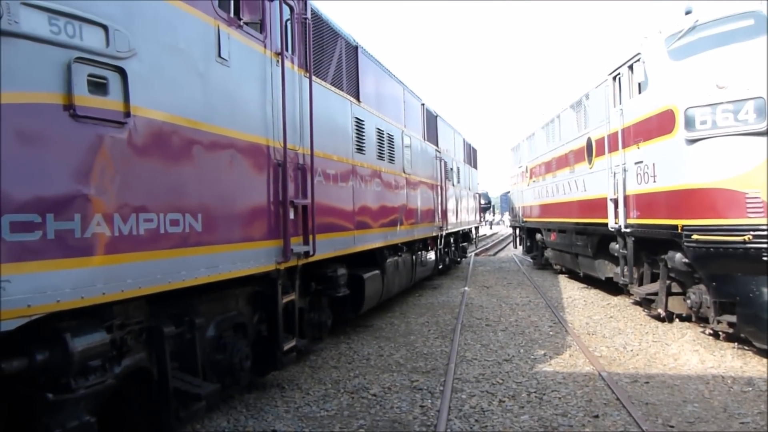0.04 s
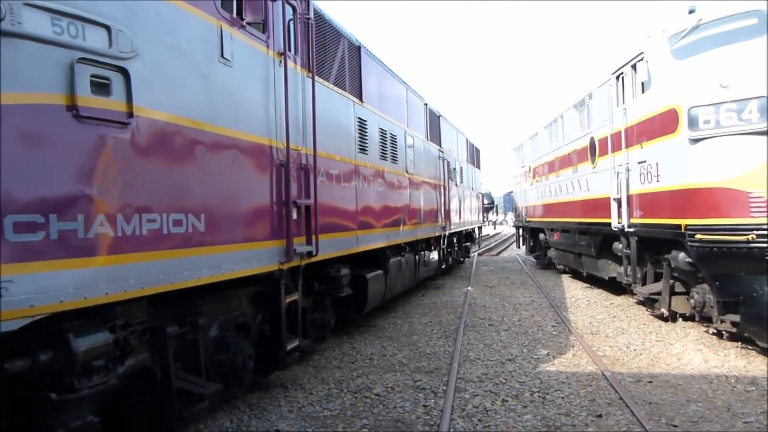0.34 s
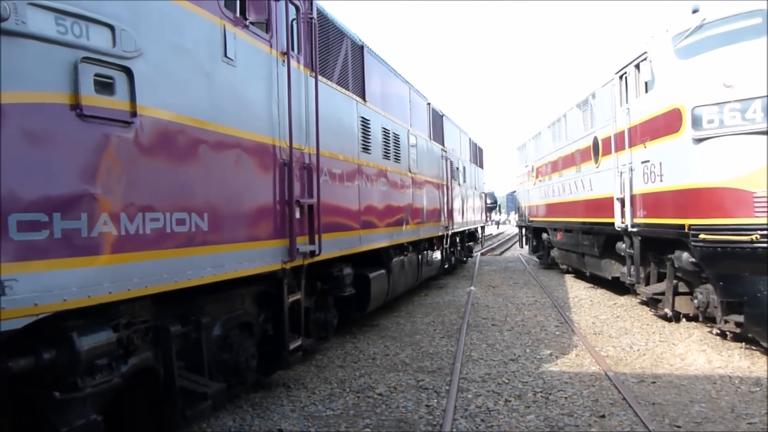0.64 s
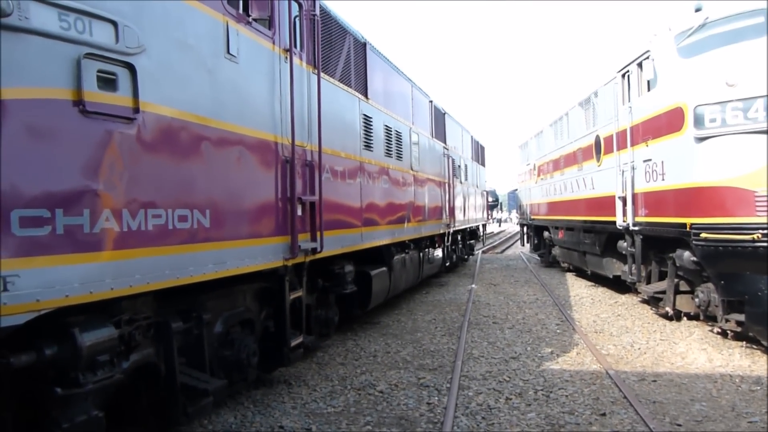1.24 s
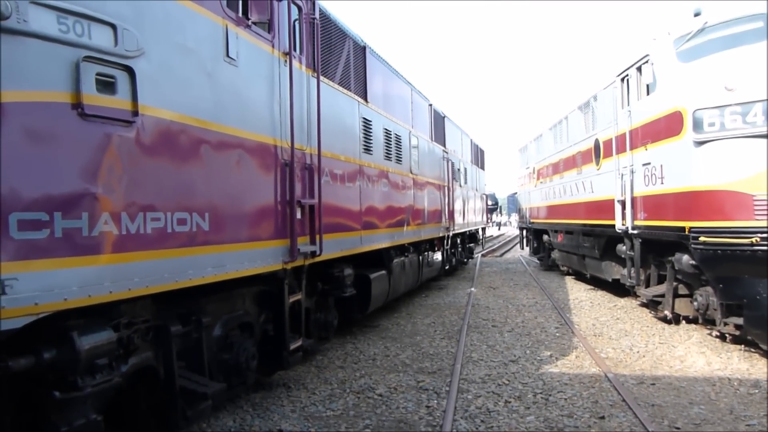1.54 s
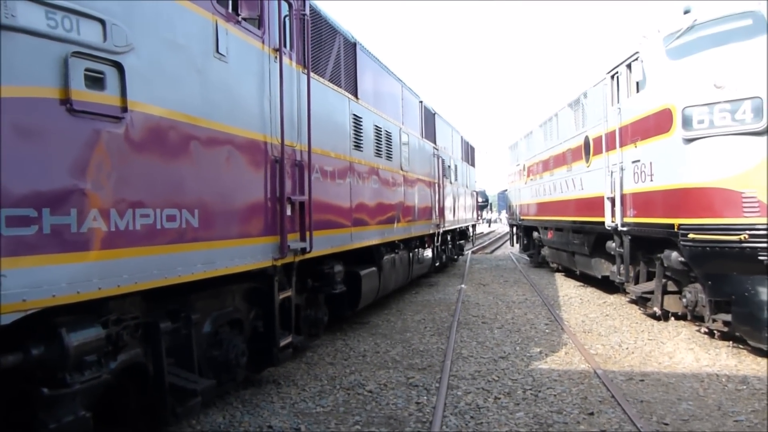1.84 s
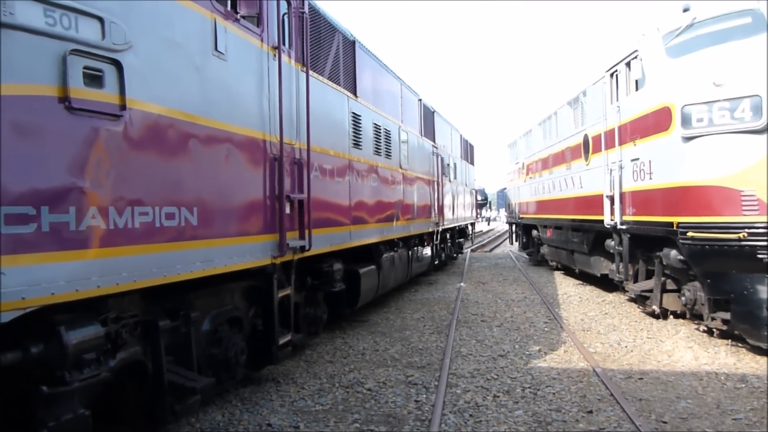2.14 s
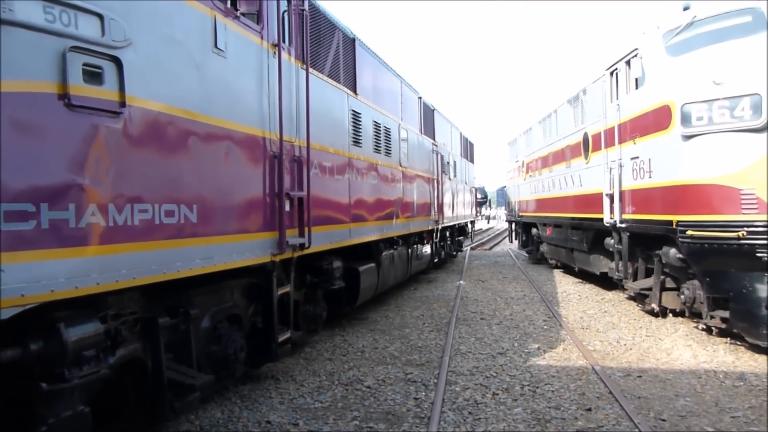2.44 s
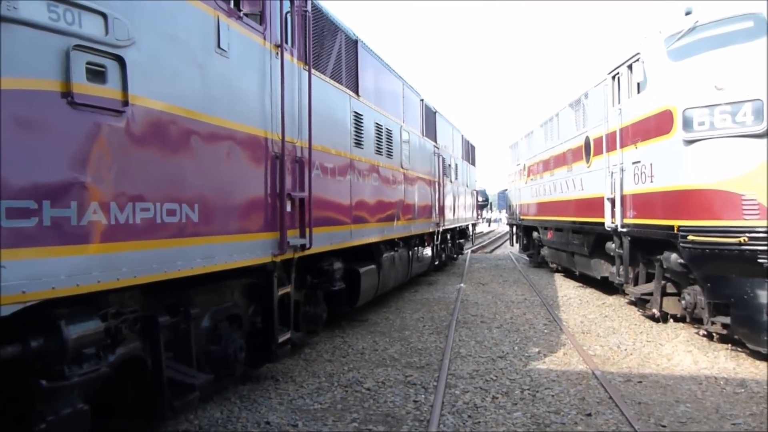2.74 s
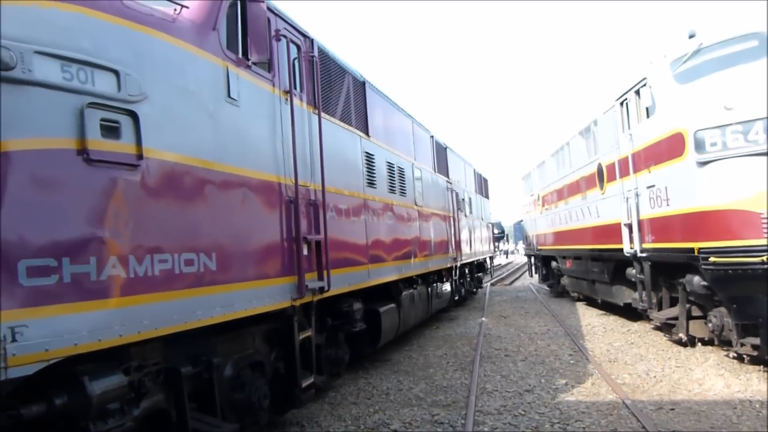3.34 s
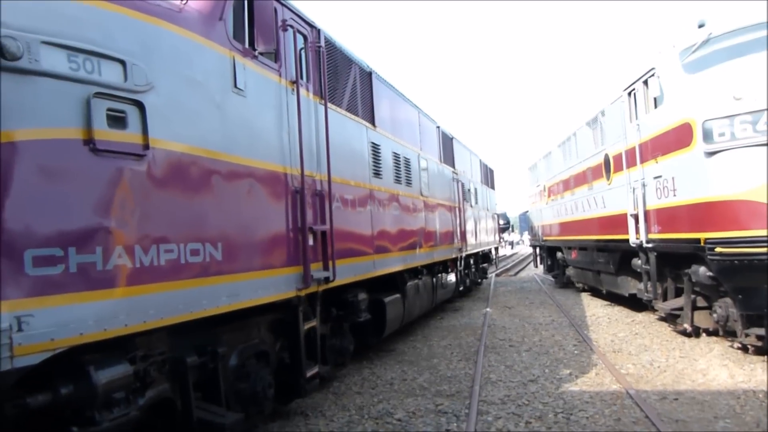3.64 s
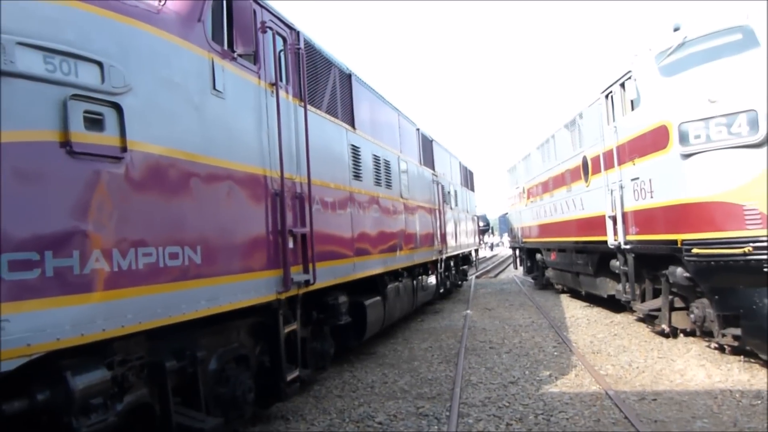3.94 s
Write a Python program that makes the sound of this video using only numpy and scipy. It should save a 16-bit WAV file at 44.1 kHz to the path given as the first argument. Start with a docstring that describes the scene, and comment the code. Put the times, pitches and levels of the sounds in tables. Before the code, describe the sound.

A train bell rings evenly while a diesel idles and compressed air hisses softly.

```python
"""A locomotive bell clangs about every 0.86 s between two parked diesel trains.
Each blow of the clapper flares bright partials that fade between strokes, while three low ones ring on;
the steel car sides scatter the ring into a shimmer. An idling engine rumbles underneath,
compressed air hisses, and an automatic gain control ducks the whole mix at each stroke."""
import sys
import numpy as np
from scipy import signal
from scipy.io import wavfile
from scipy.ndimage import uniform_filter1d

SR = 44100
rng = np.random.default_rng(int(sys.argv[2]) if len(sys.argv) > 2 else 0)


def to_wav(s):
    """Save 16-bit WAV."""
    ch = np.atleast_2d(s).T  # columns
    pcm = np.round(np.clip(ch, -1, 1) * 32767)  # PCM
    wavfile.write(sys.argv[1], SR, pcm.astype(np.int16))


N = 176400
ATTACK_S = 0.011  # onset of the clang and the clank
SCATTER_HZ = 16  # speed of the shimmer from reflections


def bell_bright():
    """Upper partials flare at each blow and die away, beating with twins and rippled by reflections."""
    # Upper bell modes: pitch_hz, level_db, t60_s, rise_s, balance_db, beat_hz, twin_share
    partials = [ (2420.7, -29, 1.6, .012, -2, 5, .05), (2466, -41, 1.3, .005, 0, 5, .2),
                (2636.4, -19.5, .95, .005, 1.5, 4, .05), (3426, -39, .65, .004, 0, 7, .6),
                (3820, -37.5, 1.4, .005, -2, 7, .65), (3923, -27, .55, .025, -2, 3.5, .6),
                (3972, -37, .7, .004, 0, 5, .3), (4087, -39, .9, .004, 0, 6, .3),
                (5056.5, -33, .6, .012, -1, 6.5, .6), (5410, -23, 1.1, .006, -1, 3, .05),
                (6100.5, -34, 1.2, .03, 0, 6, .2), (6370, -35, .65, .004, 0, 6, .3),
                (6820, -30.5, 1.0, .004, 0, 2, .3), (7014.5, -29, .8, .005, 4, 9, .2),
                (7111.5, -27, .9, .015, -3, 4, .2), (7220.5, -29, .75, .004, -3, 3, .2),
                (8635, -40, .6, .003, 0, 8, .3), (8752.5, -32, .75, .004, -2, 8, .3),
                (8935, -37, .75, .004, 0, 5, .3), (10509, -38, .65, .004, 0, 6, .3),
                (10557, -30, .7, .012, 1, 4, .2), (10582, -41, .6, .004, 0, 6, .3),
                (11228, -41, .6, .008, 0, 7, .3), (11272, -45, .6, .004, 0, 5, .3),
                (12202, -45, .55, .008, 0, 6, .3), (12322, -49, .55, .004, 0, 5, .3),
                (12437, -41.5, .55, .008, 0, 7, .3), (14003, -49, .5, .004, 0, 6, .3),
                (14223, -39, .52, .012, -1, 4, .2)]
    age, colour_db, _ = strokes()
    t, out = np.arange(N) / SR, np.zeros((2, N))
    for hz, db, t60, rise_s, balance_db, beat_hz, twin_share in partials:
        envelope = amp(db + stroke_colour(colour_db, hz) - 60 * age / t60) * (1 - np.exp(-age / rise_s))
        pair = np.exp(2j * np.pi * hz * t) * (1 + twin_share * np.exp(2j * np.pi * beat_hz * age))
        spread = stereo_phase(hz) * rng.choice([-1, 1])
        direct = np.exp(1j * (2 * np.pi * rng.random() + spread))
        reflected = .32 * ripple(SCATTER_HZ)
        out += sides(balance_db) * envelope * ((direct + reflected) * pair).real
    return out


def bell_long():
    """Hum, prime and tierce ring from blow to blow, each beating with a weak, steady twin."""
    # The three low bell modes: pitch_hz, t60_s, settle_s, balance_db, twin_offset_hz, twin_db
    partials = [(733.2, 7, .12, 2.5, -2.5, -43), (1356.8, 6, .2, .5, 2.5, -48),
                (1582.2, 8, .008, -4, -15, -33)]
    age, _, long_db = strokes()
    t, out = np.arange(N) / SR, np.zeros((2, N))
    for level_db, (hz, t60, settle_s, balance_db, twin_offset_hz, twin_db) in zip(long_db, partials):
        target = amp(level_db - 60 * age / t60)
        envelope = smooth(target - target[0], settle_s) + target[0]
        direct = sides(balance_db) * np.exp(1j * stereo_phase(hz))
        twin = amp(twin_db) * np.exp(2j * np.pi * (twin_offset_hz * t + rng.random()))
        reflected = .11 * ripple(SCATTER_HZ)
        out += ((envelope * (direct + reflected) + twin) * np.exp(2j * np.pi * hz * t)).real
    return out


def bell_clang(count=90, t60_s=0.9):
    """Many weak, close modes make the first moments of each stroke dense and metallic."""
    # Strength of a clang mode by its pitch: pitch_hz, level_db
    spectrum = [(2400, -29), (2800, -52), (3100, -65), (4000, -69.5), (4600, -104), (5400, -51.5),
                (7000, -62), (7800, -60), (8800, -46), (9700, -60), (11000, -65), (14400, -55)]
    age, colour_db, _ = strokes()
    t, ring = np.arange(SR) / SR, np.zeros((2, SR))
    edges = np.geomspace(spectrum[0][0], spectrum[-1][0], count + 1)
    for low, high, (place, turn, offset) in zip(edges, edges[1:], rng.random((count, 3))):
        hz = low + place * (high - low)
        phase = 2 * np.pi * turn + np.array([[1], [-1]]) * (offset - .5) * 2
        ring += amp(curve_at(spectrum, hz)) * np.sin(2 * np.pi * hz * t + phase)
    ring *= np.minimum(t / ATTACK_S, 1) * amp(-60 * t / t60_s)
    since_blow = np.minimum((age * SR).astype(int), SR - 1)  # each blow restarts the same ring
    return amp(colour_db.mean(axis=0)) * ring[:, since_blow]


def clapper(level_db=-23.5, t60_s=0.082, echo_db=-17, echo_t60_s=0.56):
    """The clapper lands with a short, noisy clank that echoes between the trains."""
    # Spectrum of the impact: frequency_hz, relative_db
    spectrum = [(400, -3), (1500, 0.5), (2650, -12), (3100, -10), (4000, -5), (4600, -10), (6800, -7),
                (8000, -25), (11000, -16), (15000, -33)]
    age, colour_db, _ = strokes()
    attack = np.minimum(age / ATTACK_S, 1)
    fade = amp(-60 * age / t60_s) + amp(echo_db - 60 * age / echo_t60_s)
    return amp(level_db + colour_db.mean(axis=0)) * attack * fade * noise(spectrum)


def strokes():
    """Per sample: seconds since the latest blow, its four colour levels and its three low-mode levels."""
    # Each blow has its own colour and meets the low modes in or out of step, leaving each at a new level.
    # start_s, colour_db in four bands from low to high, hum_db, prime_db, tierce_db
    blows = [(-.26, 8.5, 5, 6.5, -1, -24, -29.5, -17.5), (.603, 1.5, 1, 1.5, -9, -21.5, -25.5, -21),
             (1.46, 4, 5.5, 2.5, -2, -35.5, -27.5, -18), (2.322, 2, 4, 1, 2, -27.5, -33, -18.5),
             (3.192, 5, 3, 4, 7, -28, -26, -23.5)]
    rows, t = np.array(blows), np.arange(N) / SR
    latest = np.maximum(np.searchsorted(rows[:, 0], t, side="right") - 1, 0)
    blow = rows[latest].T
    return np.maximum(t - blow[0], 0), blow[1:5], blow[5:]


def stroke_colour(colour_db, hz):
    """The blow's boost or cut in dB at one pitch, blended between its colour bands."""
    # Centres of the four colour bands: frequency_hz
    bands = [3400, 5400, 7000, 10700]
    return sum(np.interp(hz, bands, share) * db for share, db in zip(np.eye(len(bands)), colour_db))


def engine(waver_depth=0.47, waver_hz=1.06):
    """The idling diesel: a broad roar with wavering tones in it."""
    # Tones of the idle: pitch_hz, level_db
    idle_tones = [(48, -43), (58, -57.5), (86, -41.5), (97.7, -39), (107, -48.5), (134, -50), (181, -40),
                  (295, -46), (411, -39.5), (705.3, -38), (1059, -43.5), (1410, -47), (1481, -52),
                  (1498, -45.5)]
    # Spectrum of the roar: frequency_hz, relative_db
    roar_spectrum = [(15, -33), (27, -11), (42, -5), (68, -3.5), (92, -1), (150, -4), (185, 0.5),
                     (290, 2.5), (460, 2.5), (580, -2.5), (730, -2), (950, -11.5), (1250, -18),
                     (1700, -17.5), (2100, -16.5), (2600, -28), (3100, -31.5), (5000, -34.5), (15000, -63)]
    # Gentle swells of the roar: time_s, level_db
    roar_level = [(0, -25), (.7, -24.5), (1.35, -23.5), (1.6, -27), (2.2, -24), (2.45, -27), (3.1, -24.5),
                  (3.5, -25.5), (4, -24.5)]
    t, tones = np.arange(N) / SR, np.zeros(N)
    for hz, db in idle_tones:
        waver = 1 + waver_depth * ripple(waver_hz, channels=1)[0]
        tones += amp(db) * (waver * np.exp(2j * np.pi * (hz * t + rng.random()))).real
    return tones + fader(roar_level) * noise(roar_spectrum, patch_db=0.8)


def air():
    """Escaping compressed air hisses, swelling and easing."""
    # Spectrum of the hiss: frequency_hz, relative_db
    spectrum = [(1000, -8), (2800, 4), (4500, 2.5), (7500, -0.5), (9800, -4.5), (12500, -5), (14000, -10.5),
                (15500, -21)]
    # Swell of the hiss: time_s, level_db
    swell = [(0, -57), (.5, -49.5), (1.3, -47), (1.75, -42), (2.1, -42), (2.28, -37), (2.55, -42),
             (3.05, -44.5), (4, -48)]
    return fader(swell) * noise(spectrum)


def noise(spectrum, patch_db=0, size=2048):
    """Coloured stereo noise of rms one; patch_db adds drifting louder and softer patches."""
    # Stereo image, centred in the bass and wide in the treble: frequency_hz, left_right_correlation
    likeness = [(30, .999), (220, .9992), (400, .992), (700, .96), (1000, .9), (2000, .83), (4000, .68),
                (8000, .47), (14000, .35)]
    hz = np.fft.rfftfreq(size, 1 / SR)
    frames = N // (size // 2) + 2
    a, b, c, d, patches = rng.standard_normal((frames, len(hz), 5)).T
    patches = evened(uniform_filter1d(uniform_filter1d(patches, size=10, axis=0), size=3, axis=1))
    correlation = curve_at(likeness, hz)[:, None]
    left = a + 1j * b
    right = correlation * left + np.sqrt(1 - correlation ** 2) * (c + 1j * d)
    shaped = np.array([left, right]) * amp(curve_at(spectrum, hz)[:, None] + patch_db * patches)
    return evened(signal.istft(shaped, window="cosine", nperseg=size)[1][:, :N])


def ripple(rate_hz, channels=2, size=2048):
    """Slow random wander of amplitude and phase in each channel, about one in rms."""
    white = rng.standard_normal((channels, size)) + 1j * rng.standard_normal((channels, size))
    hz = np.fft.fftfreq(size, N / SR / size)
    wander = evened(np.fft.ifft(white / (1 + (hz / rate_hz) ** 2)))
    return np.array([np.interp(np.arange(N) * size / N, np.arange(size), row) for row in wander])


def stereo_phase(hz):
    """Left and right phases, 0.68 radians apart at 5500 Hz and widening with pitch."""
    return np.array([[.5], [-.5]]) * .68 * np.sqrt(hz / 5500)


def sides(balance_db):
    """Left and right gains; a positive balance leans left."""
    return amp(np.array([[.5], [-.5]]) * balance_db)


def fader(points):
    """Gain per sample along (time_s, level_db) points."""
    return amp(np.interp(np.arange(N) / SR, *np.transpose(points)))


def curve_at(points, hz):
    """A curve's value at hz, interpolated along log frequency."""
    point_hz, value = np.transpose(points)
    return np.interp(np.log(hz + 1), np.log(point_hz + 1), value)


def smooth(x, lag_s):
    """Follows x with a one-pole lag."""
    pole = np.exp(-1 / (lag_s * SR))
    return signal.lfilter([1 - pole], [1, -pole], x)


def amp(db):
    """Decibels to gain."""
    return 10 ** (np.asarray(db) / 20)


def evened(x):
    """Scales to an rms of one."""
    return x / np.sqrt(np.mean(abs(x) ** 2) + 1e-20)


def scene():
    """Bell over engine and air."""
    return bell_bright() + bell_clang() + bell_long() + clapper() + engine() + air()


def record(dry):
    """Gain control ducks after loud, bright moments and recovers; a low-pass trims the very top."""
    threshold_db, duck_share, attack_s, release_db_per_s = -22.5, 0.31, 0.021, 35
    sidechain_hz, cutoff_hz = 910, 15600
    sidechain = signal.sosfilt(signal.butter(2, sidechain_hz, "high", fs=SR, output="sos"), dry)
    power_db = 10 * np.log10(smooth((sidechain ** 2).mean(0), attack_s) + 1e-12)
    fall_db = np.arange(N) / SR * release_db_per_s
    peak_db = np.maximum.accumulate(power_db + fall_db) - fall_db  # peaks sink at the release rate
    ducked = dry * amp(-duck_share * np.maximum(peak_db - threshold_db, 0))
    low_pass = signal.firwin(511, cutoff_hz, window=("kaiser", 9), fs=SR)
    return signal.oaconvolve(ducked, low_pass[None], "same")


dry = scene()
out = record(dry)
to_wav(out)
```